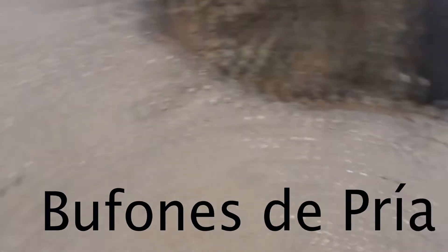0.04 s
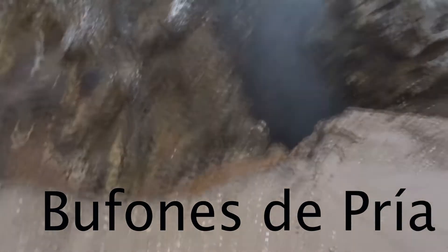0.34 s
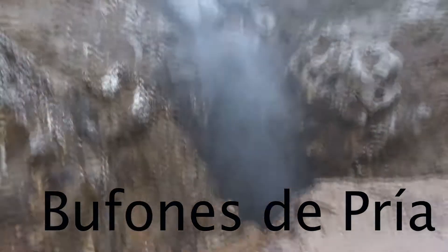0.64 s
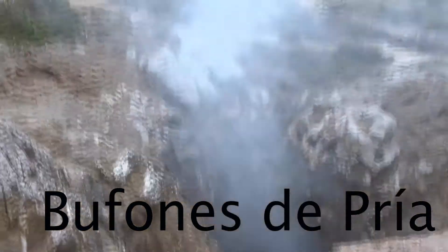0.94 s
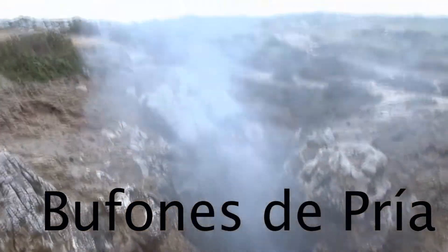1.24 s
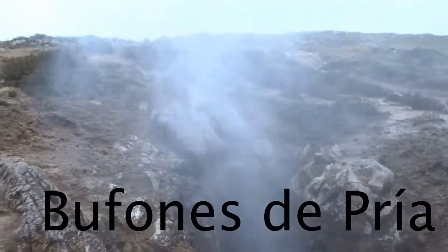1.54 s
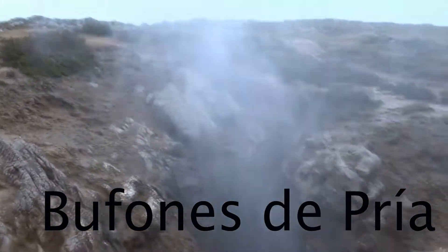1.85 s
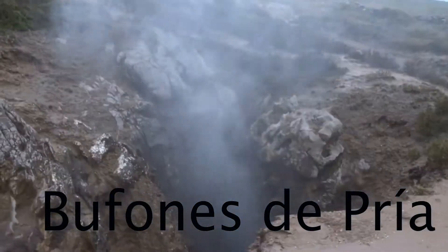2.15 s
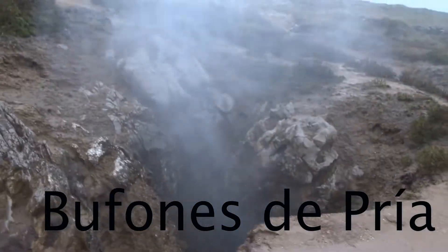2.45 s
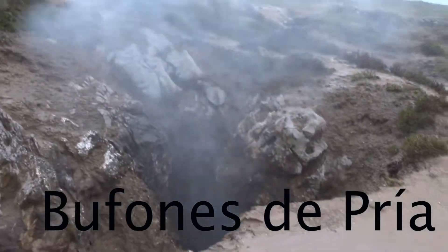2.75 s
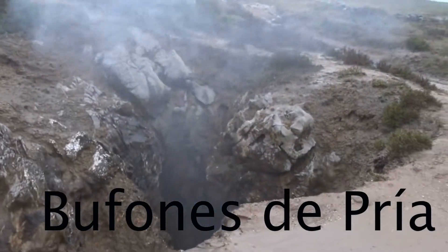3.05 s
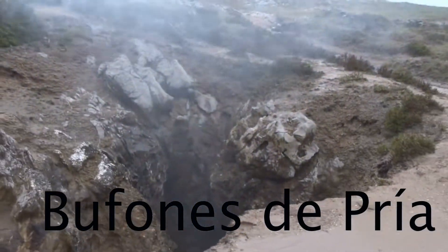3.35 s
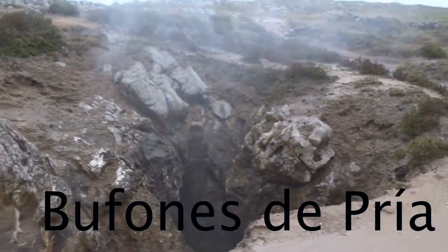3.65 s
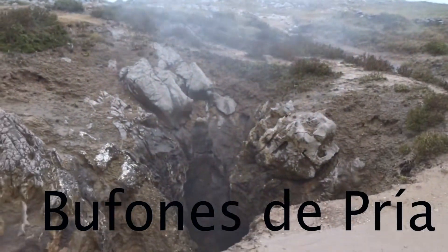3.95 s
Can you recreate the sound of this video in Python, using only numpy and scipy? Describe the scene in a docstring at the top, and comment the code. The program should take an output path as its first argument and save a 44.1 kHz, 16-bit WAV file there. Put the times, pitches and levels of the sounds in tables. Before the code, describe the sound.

Air and spray hiss out of a coastal rock hole as heavy wind buffets the microphone. A hollow roar swells just after the hiss peaks, then the hiss fades, leaving ragged gusts, a weaker roar and faint distant surf.

```python
"""A blowhole on a sea cliff. Wind buffets the microphone from the start, with far surf underneath.
A wave drives air and spray out of the rock in one long hiss, dull until the microphone swings to face it.
Just after the hiss peaks a hollow roar swells, and the limiter ducks everything under the heaviest thumps.
By three seconds the hiss is dying away; the wind rasps and knocks in sharp eddies over a weaker roar,
drops for a moment, and comes back."""
import sys
import numpy as np
from scipy import signal
from scipy.fft import rfft, irfft, next_fast_len
from scipy.io import wavfile
from scipy.ndimage import uniform_filter1d, minimum_filter1d, map_coordinates

SR = 44100
rng = np.random.default_rng(int(sys.argv[2]) if len(sys.argv) > 2 else 0)


def generate_wav(signal):
    """Clip the signal to [-1, 1] and save it as 16-bit WAV at the path in sys.argv[1]."""
    frames = np.transpose(np.atleast_2d(signal))
    scaled = np.clip(frames, -1, 1) * 32767
    pcm = np.round(scaled).astype(np.int16)
    wavfile.write(sys.argv[1], SR, pcm)


N = 176400


def amp(db):
    """Decibels to gain."""
    return 10 ** (np.asarray(db) / 20)


def unit(x):
    """Scale to rms 1."""
    return x / np.sqrt(np.mean(x ** 2) + 1e-20)


def along(points, hz):
    """Read (Hz, value) points on a log frequency axis."""
    freqs, values = np.transpose(points)
    return np.interp(np.log(hz + 1), np.log(freqs + 1), values)


def curve(rows):
    """Draw a fader move through (seconds, value) points, one value per sample."""
    return np.interp(np.arange(N) / SR, *np.transpose(rows))


def wobble(rate):
    """A smooth random curve with `rate` knots a second."""
    return map_coordinates(rng.standard_normal(4096), [np.arange(N) * rate / SR], mode="wrap")


def filtered(x, response):
    """EQ x with a gain given as a function of frequency."""
    size = next_fast_len(N + 8192)
    return irfft(rfft(x, size) * response(np.fft.rfftfreq(size, 1 / SR)), size)[..., :N]


def rush(colour, correlation):
    """Stereo noise of rms 1 with a given spectrum and left-right correlation."""
    def mid_side_gains(hz):
        width = np.arccos(np.clip(along(correlation, hz), -1, 1)) / 2
        return amp(along(colour, hz)) * np.array([np.cos(width), np.sin(width)])
    mid, side = filtered(rng.standard_normal((2, N)), mid_side_gains)
    return unit(np.array([mid + side, mid - side]))


def patchy(x, depth_db):
    """Mottle x with random patches of gain over time and frequency."""
    spectrum = signal.stft(x, nperseg=512)[2]
    patches = uniform_filter1d(rng.standard_normal(spectrum.shape[1:]), size=7, axis=0)
    patches = uniform_filter1d(patches, size=10, axis=1)
    return signal.istft(spectrum * amp(depth_db * unit(patches)), nperseg=512)[1][:, :N]


def burst(noise, swell):
    """Noise under a short swell, scaled to the rms of that swell."""
    return swell * noise * np.sqrt(np.mean(swell ** 2) / (np.mean((swell * noise) ** 2) + 1e-20))


# The gusts, and the deep rumble under them. Each row: time in seconds, relative level in dB.
GUST_LEVEL = [(0, -22.5), (.22, -16), (.32, -26), (.4, -18.5), (.72, -27.5), (.85, -17.5), (1.1, -23),
              (1.27, -21.5), (1.42, -17.5), (1.6, -12.5), (2.0, -19.5), (2.35, -21.5), (2.48, -24.5),
              (2.66, -21), (2.86, -28), (2.96, -19), (3.08, -26.5), (3.15, -26), (3.42, -22.5),
              (3.59, -23.5), (3.63, -33.5), (3.71, -43.5), (3.755, -24.5), (3.83, -20), (3.89, -29),
              (4, -23)]
RUMBLE_LEVEL = [(0, -28), (.2, -40.5), (.6, -28.5), (.95, -26), (1.35, -23.5), (1.55, -25.5), (2.05, -40),
                (2.18, -20.5), (2.32, -32.5), (2.6, -20.5), (2.8, -40), (3.15, -34.5), (3.45, -26.5),
                (3.57, -26.5), (3.65, -39.5), (3.73, -55), (3.8, -24), (4, -27)]
# The rasp rides on the gusts. Each row: time in seconds, offset from the gust level in dB.
RASP_OFFSET = [(0, -30), (.5, -12), (1.4, -9.5), (1.7, -11), (2.1, -8.5), (2.5, -12.5), (2.8, -13.5),
               (3.2, -10), (3.5, -10.5), (3.68, -16), (3.8, -16.5), (4, -5.5)]
# The wind's three tones, low to high. Each row: frequency in Hz, relative level in dB.
RUMBLE_COLOUR = [(15, -8), (30, 3.5), (42, 3.5), (70, 4), (110, 7), (200, -19), (600, -83)]
BUFFET_COLOUR = [(30, -9), (70, -2.5), (125, 1.5), (180, 2), (270, -1.5), (400, -5), (600, -14),
                 (900, -24.5), (1400, -47.5), (3000, -66), (6000, -76)]
RASP_COLOUR = [(100, -23), (350, 8), (700, 6.5), (1000, 0.5), (1500, -5.5), (2200, -15), (3200, -28.5),
               (4500, -40), (7000, -67.5), (12000, -70)]
# Stereo image of buffet, rasp and eddies. Each row: frequency in Hz, left-right correlation.
WIND_CORRELATION = [(40, 1), (130, 0.9), (290, 0.53), (640, 0.15), (1400, 0.41), (3100, 0.73), (7000, 0.62)]
RUMBLE_GAIN_DB, BUFFET_GAIN_DB = 2.5, 4.5


def wind():
    """Turbulence on the microphone: a rumble, a fluttering buffet and a rasp that flares with it."""
    gust_db = curve(GUST_LEVEL)
    flutter = wobble(70)
    rumble = rush(RUMBLE_COLOUR, correlation=[(40, 0.93), (130, 0.75)])
    buffet = unit(amp(2 * flutter) * rush(BUFFET_COLOUR, WIND_CORRELATION))
    crackle_db = 2.35 * flutter + 3.8 * wobble(230) + 2.7 * wobble(900)
    rasp = unit(amp(crackle_db) * rush(RASP_COLOUR, WIND_CORRELATION))
    return (amp(RUMBLE_GAIN_DB + curve(RUMBLE_LEVEL)) * rumble
            + amp(BUFFET_GAIN_DB + gust_db) * buffet
            + amp(gust_db + curve(RASP_OFFSET)) * rasp)


# The bed of far surf. Each row: frequency in Hz, relative level in dB.
SURF_COLOUR = [(40, -13.5), (400, 3), (700, -16), (1300, -7), (2200, -19), (3300, -23), (4400, -38),
               (5500, -48.5), (10000, -36.5), (14000, -65)]
SURF_DB = -55.5


def surf():
    """The sea below the cliff: a dull, nearly steady wash, dead centre."""
    return amp(SURF_DB + 1.2 * wobble(6.9)) * rush(SURF_COLOUR, correlation=[(100, 1.0), (2000, 1.0)])


# The arc of the blow. Each row: time in seconds, relative level in dB.
JET_LEVEL = [(0, -48.5), (.12, -43), (.24, -40.5), (.29, -37.5), (.55, -35.5), (.8, -38), (.91, -34.5),
             (1.02, -39), (1.165, -33.5), (1.19, -44), (1.25, -34.5), (1.33, -34), (1.45, -34.5),
             (1.54, -35), (1.61, -37.5), (1.7, -40), (1.77, -38), (1.86, -42), (2.3, -46), (2.52, -51),
             (2.68, -55), (2.78, -59.5), (2.89, -57.5)]
# The tone of the hiss. Each row: frequency in Hz, relative level in dB.
JET_COLOUR = [(150, -19), (500, 11), (900, 10), (1400, 5), (2200, 3), (3200, 2.5), (4000, -0.5), (5000, -6),
              (6500, -3.5), (8500, -3), (10400, 1), (11600, -4), (13000, -11.5), (15500, -21)]
# EQ on the hiss while the microphone points at the ground. Each row: frequency in Hz, gain in dB.
OFF_AXIS_EQ = [(300, 24.5), (1500, 5.5), (3000, 3), (4200, -1), (5500, 7), (7400, 1), (8800, -11),
               (11000, -9), (15000, -17)]
# Stereo image, facing the hole and turned aside. Each row: frequency in Hz, left-right correlation.
JET_CORRELATION = [(300, 0.94), (1500, 0.99), (3000, 0.99), (6000, 1), (11000, 1)]
OFF_AXIS_CORRELATION = [(300, 0.45), (3000, 0.63), (6000, 0.94), (10000, .7)]
# The rush of air under the spray, below AIR_EDGE_HZ. Each row: time in seconds, boost in dB.
AIR_BOOST = [(.25, 0), (.6, 1), (.85, 2.5), (1.14, 2.5), (1.33, 3.5), (1.5, 1), (1.7, 2), (2.1, 0.5),
             (2.5, 3), (2.9, 2)]
# The jet sputters more as it weakens. Each row: time in seconds, flutter depth in dB.
SPUTTER_DEPTH = [(1.3, .5), (1.9, 1.6)]
JET_GAIN_DB, JET_DIES_DB_PER_S = 6, 72
AIR_EDGE_HZ, SPUTTER_PER_S = 6400, 78
TURN_START_S, TURN_END_S = 0.12, 0.29


def jet():
    """Air and spray hiss out of the hole, duller and more diffuse until the microphone faces it."""
    t = np.arange(N) / SR
    hiss = patchy(rush(JET_COLOUR, JET_CORRELATION), depth_db=0.93)
    air = filtered(hiss, lambda hz: 1 / (1 + (hz / AIR_EDGE_HZ) ** 6))
    spray = hiss - air
    direct = spray + amp(curve(AIR_BOOST)) * air
    aside = filtered(rush(JET_COLOUR, OFF_AXIS_CORRELATION), lambda hz: amp(along(OFF_AXIS_EQ, hz)))
    facing = np.clip((t - TURN_START_S) / (TURN_END_S - TURN_START_S), 0, 1)
    heard = np.sqrt(facing) * direct + np.sqrt(1 - facing) * aside
    spent_s = np.maximum(t - JET_LEVEL[-1][0], 0)  # time since the wave ran out
    level_db = JET_GAIN_DB + curve(JET_LEVEL) - JET_DIES_DB_PER_S * spent_s
    sputter_db = curve(SPUTTER_DEPTH) * wobble(SPUTTER_PER_S)
    return heard * amp(level_db + sputter_db)


# Sharp eddies. Each row: centre in seconds, relative puff level in dB, crack level in dB before
# its low-pass, cutoff of that low-pass in Hz, half length in seconds.
EDDIES = [(.063, -20, -42, 3030, .0025), (.085, -16, -42, 3000, .003), (.183, -23, -40, 3000, .0026),
          (.223, -14.5, -42, 3000, .002), (1.9607, -14, -18, 7000, .0012), (2.122, -22, -33, 4000, 0.0023),
          (2.577, -25, -52, 4500, .002), (2.596, -23, -37, 4000, .0018), (2.662, -22, -35.5, 3500, .0015),
          (2.7014, -21, -35, 4500, .001), (2.7085, -27, -38, 4000, .001), (2.733, -22, -42, 4000, .0012),
          (2.795, -26, -40, 3000, .0012), (2.9468, -15.5, -43, 6000, .0008), (2.954, -11, -35, 4500, .002),
          (2.9966, -17, -38.5, 7000, .0035), (3.005, -17, -40, 10000, .0018),
          (3.029, -27, -38, 2500, .0015), (3.111, -31.5, -41, 2980, .0012), (3.124, -20, -41, 3500, .0016),
          (3.1428, -15, -38.5, 6000, 0.0013), (3.152, -21.5, -43, 4000, .003),
          (3.185, -14.5, -37.5, 5000, .0018), (3.2254, -24, -42, 4000, .002),
          (3.2324, -21, -43, 3000, .002), (3.3049, -17.5, -43, 3500, .0022), (3.335, -23, -49, 3520, .002),
          (3.3589, -21, -34, 5000, .002), (3.371, -20, -41, 2400, .0012), (3.394, -25.5, -46, 3000, .0015),
          (3.404, -27, -37, 3000, 0.00095), (3.422, -20, -54, 3000, .002), (3.448, -25.5, -54, 2420, .0017),
          (3.467, -22, -47, 2400, .0018), (3.4971, -28, -45, 3200, .0012), (3.505, -23, -38, 2400, .002),
          (3.5247, -30, -37, 2500, .001), (3.5705, -23, -36.5, 2500, .002), (3.746, -26, -51, 2180, .0017),
          (3.761, -21, -57, 2200, .003), (3.8126, -16, -40.5, 5500, .0012),
          (3.8494, -16.5, -41, 4500, 0.0023)]
# The soft puff and the bright crack. Each row: frequency in Hz, relative level in dB.
PUFF_COLOUR = [(60, -10), (250, 8), (700, 7.5), (1200, -3.5), (2200, -13.5), (3500, -34), (5000, -52),
               (8000, -69)]
CRACK_COLOUR = [(500, -15), (1500, 0), (3300, -1), (5000, -5), (7500, -9), (11000, -17), (14000, -45)]
PUFF_GAIN_DB, RAGGED_DB = -2, 3.2


def eddies():
    """Each eddy hits the microphone as a short ragged puff with a dry crack of its own brightness."""
    t = np.arange(N) / SR
    ragged = unit(amp(RAGGED_DB * wobble(700)))
    puff_noise = ragged * rush(PUFF_COLOUR, WIND_CORRELATION)
    crack_noise = ragged * rush(CRACK_COLOUR, WIND_CORRELATION)
    out = np.zeros((2, N))
    for centre_s, puff_db, crack_db, cutoff_hz, half_s in EDDIES:
        near = np.flatnonzero(np.abs(t - centre_s) < 10 * half_s)
        swell = np.exp(-((t[near] - centre_s) / half_s) ** 2)
        lowpass = signal.butter(3, cutoff_hz, fs=SR, output="sos")
        puff = burst(puff_noise[:, near], swell)
        crack = signal.sosfilt(lowpass, burst(crack_noise[:, near], swell))
        out[:, near] += amp(puff_db + PUFF_GAIN_DB) * puff + amp(crack_db) * crack
    return out


def shove(centre_s, peak_db, hz, half_s):
    """One push of air: a cycle or two, a little out of step between left and right."""
    t = np.arange(N) / SR - centre_s
    near = np.flatnonzero(np.abs(t) < 10 * half_s)
    phase, skew = rng.standard_normal(2)
    angle = 2 * np.pi * (hz * t[near] + phase) + 0.68 * skew * np.array([[1], [-1]])
    out = np.zeros((2, N))
    out[:, near] = amp(peak_db) * np.exp(-(t[near] / half_s) ** 2) * np.sin(angle)
    return out


# The heavy hits of the wind. Each row: centre in seconds, envelope peak in dB.
THUMPS = [(0.094, -8.5), (0.247, -6), (0.442, -3), (0.837, -13), (1.18, -13), (1.262, -8), (1.34, -8),
          (1.384, -8), (1.481, 4), (1.552, -9.5), (1.591, 0.5), (1.686, 0), (1.855, -11.5), (1.893, -3.5),
          (2.1, -17.5), (2.135, -3.5), (2.343, -16), (2.563, -17), (2.715, -4.5), (2.793, -11), (2.947, -9)]
THUMP_TYPICAL_HZ = 193.4


def thumps():
    """Heavy buffets: one dull shove of air each, the strongest enough to work the limiter."""
    out = np.zeros((2, N))
    for centre_s, peak_db in THUMPS:
        hz = THUMP_TYPICAL_HZ * np.exp(0.16 * rng.standard_normal())
        out += shove(centre_s, peak_db, hz, half_s=0.0041)
    return out


# The light hits of the wind. Each row: centre in seconds, envelope peak in dB, pitch in Hz.
KNOCKS = [(.4308, -11, 630), (2.1244, -14, 685), (2.9556, -12.5, 690), (3.1321, -14.5, 635),
          (3.2197, -7, 537), (3.2642, -11, 570), (3.3583, -5.5, 570), (3.4975, -9, 645), (3.5049, -12, 578),
          (3.745, -14.5, 590), (3.8116, -19, 610)]


def knocks():
    """Small fast eddies slap the microphone: shorter, higher shoves that sound as hollow knocks."""
    return sum(shove(centre_s, peak_db, hz, half_s=0.0012) for centre_s, peak_db, hz in KNOCKS)


# The roar's two swells. Each row: time in seconds, level in dB.
ROAR_LEVEL = [(1.3, -39), (1.53, -13.5), (1.8, -21.5), (2.05, -23), (2.3, -46), (2.7, -35.5), (3.25, -22),
              (3.55, -32), (3.63, -43)]
# Its low-mid body. Each row: frequency in Hz, relative level in dB.
ROAR_COLOUR = [(100, -9), (200, 7), (270, 7), (380, 1.5), (520, -3), (900, -65.5)]


def roar():
    """A hollow roar swells just after the jet's peak and once more, weaker, in the last gusts."""
    body = rush(ROAR_COLOUR, correlation=[(200, 1.0), (500, 0.39)])
    return amp(curve(ROAR_LEVEL) + wobble(17)) * body


def scene():
    """Wind, sea and blowhole together."""
    return wind() + surf() + jet() + eddies() + thumps() + knocks() + roar()


# The limiter's sidechain EQ. Each row: frequency in Hz, gain in dB.
SIDECHAIN_EQ = [(30, -7.5), (110, -1.5), (600, -3), (1500, -0.5)]
THRESHOLD_DB, RELEASE_S, ATTACK_SAMPLES = -10, 0.038, 97
LOW_CUT_HZ, TOP_HZ = 34, 15700


def record(dry):
    """A limiter ducks fast under the strongest buffets and recovers slower; then the band limits."""
    sidechain = filtered(dry, lambda hz: amp(along(SIDECHAIN_EQ, hz)))
    overshoot = np.maximum(np.abs(sidechain).max(axis=0) / amp(THRESHOLD_DB), 1)
    duck = np.log(overshoot) + 1e-9
    # Each duck decays exponentially until a deeper one takes over.
    decay = np.arange(N) / SR / RELEASE_S
    held = np.exp(np.maximum.accumulate(np.log(duck) + decay) - decay)
    gain = minimum_filter1d(np.exp(-held), size=ATTACK_SAMPLES)
    gain = uniform_filter1d(gain, size=ATTACK_SAMPLES)
    return filtered(dry * gain, lambda hz: (hz < TOP_HZ) * hz ** 2 / np.hypot(hz ** 2, LOW_CUT_HZ ** 2))


dry = scene()
out = record(dry)
generate_wav(out)
```